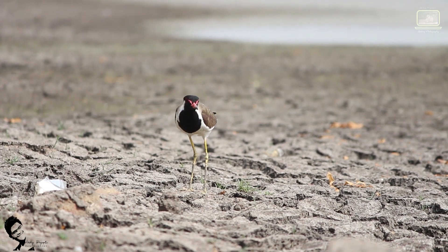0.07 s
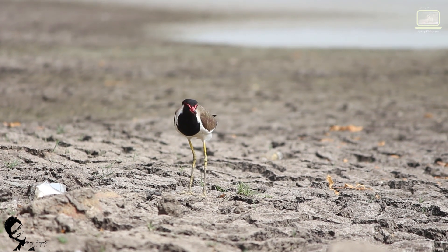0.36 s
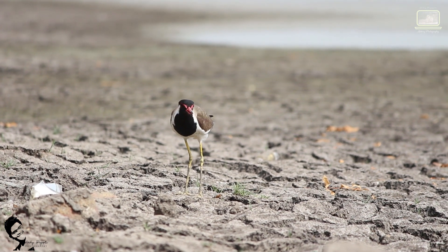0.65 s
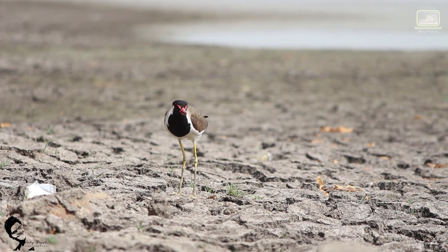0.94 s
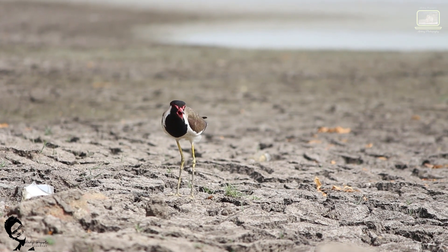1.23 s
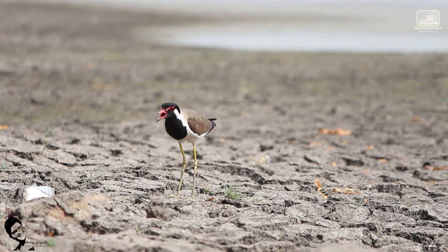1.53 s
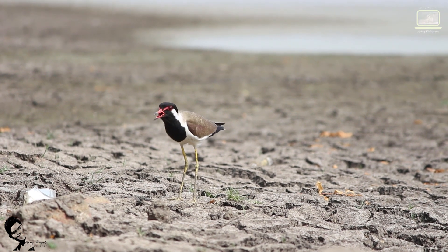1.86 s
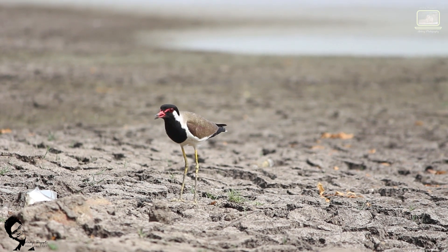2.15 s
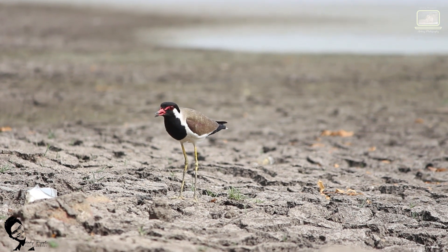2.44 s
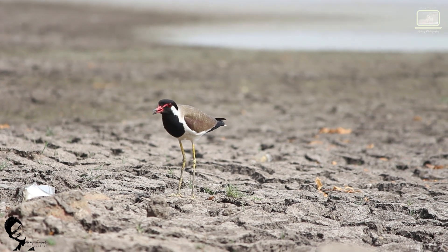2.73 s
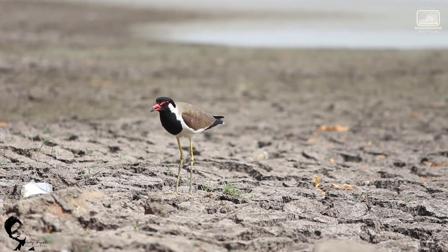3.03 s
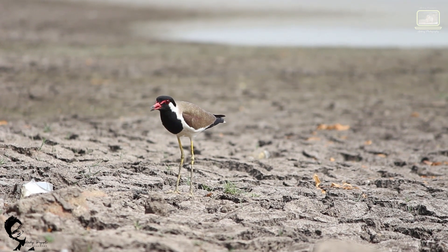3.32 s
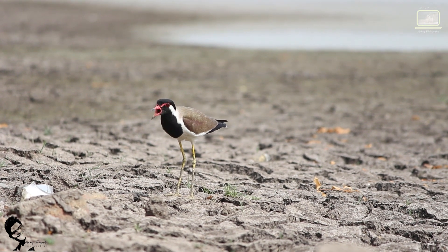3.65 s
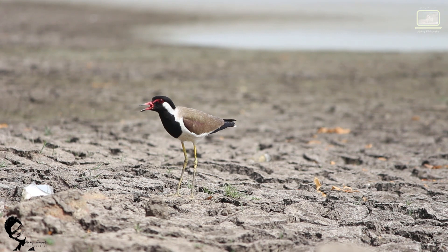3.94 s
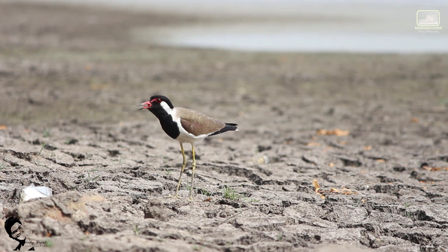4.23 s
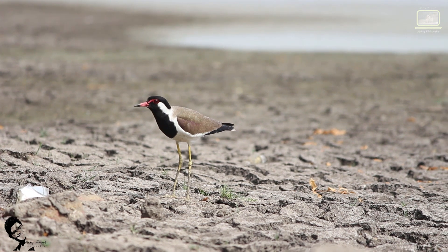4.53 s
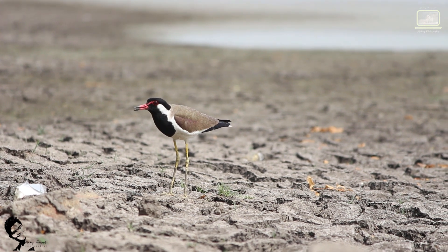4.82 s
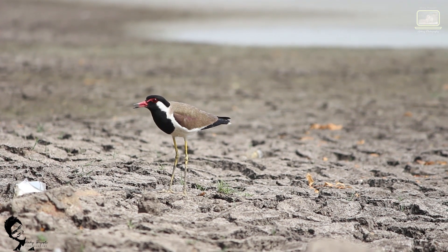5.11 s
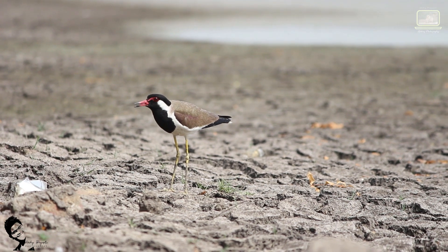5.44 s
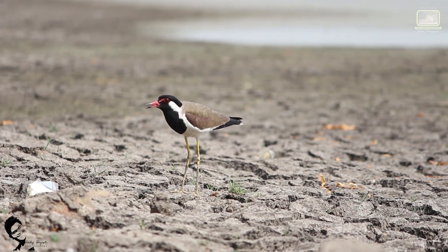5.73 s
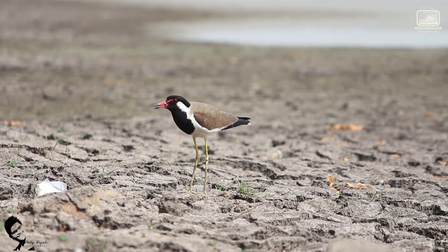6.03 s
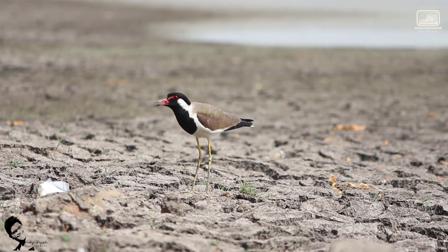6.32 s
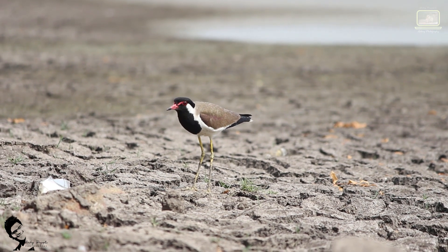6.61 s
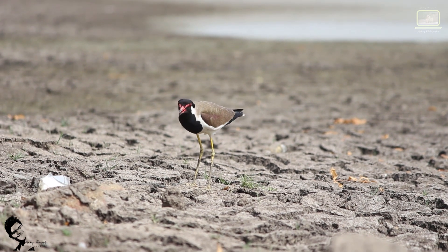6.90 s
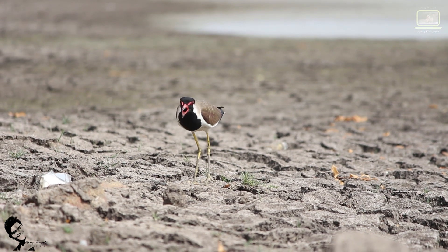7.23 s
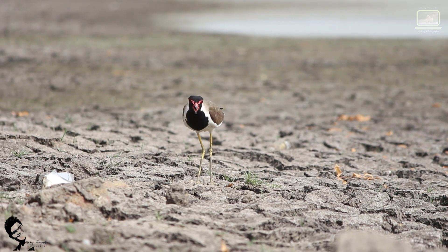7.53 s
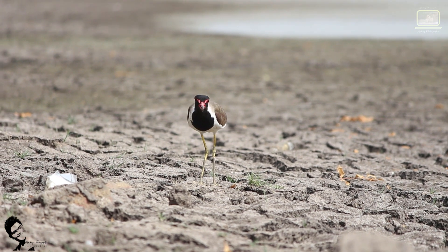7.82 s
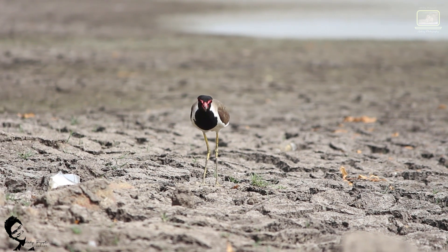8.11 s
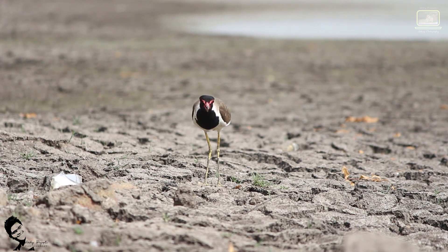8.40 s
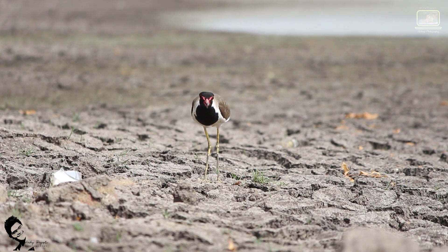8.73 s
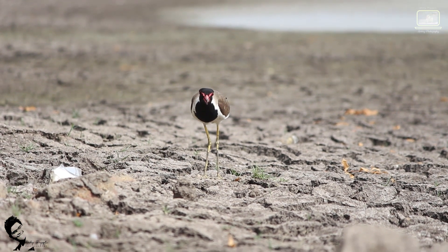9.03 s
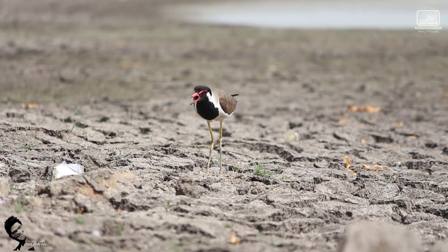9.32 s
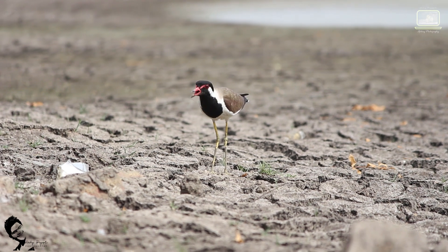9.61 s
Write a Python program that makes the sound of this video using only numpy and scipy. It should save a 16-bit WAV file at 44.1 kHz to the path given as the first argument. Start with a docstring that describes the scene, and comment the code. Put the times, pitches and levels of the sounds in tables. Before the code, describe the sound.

Loud, rapid, high calls of a wading bird come in repeated bursts outdoors, with other birds answering and a soft rumble behind.

```python
"""Lapwings on a mud flat

A lapwing scolds in bursts: a sharp note, fluttering pips that grow longer, then a falling slur
that flips up at its end. Its voice box, the syrinx, flutters by shutting about 80 times a second.
A distant lapwing answers with a like phrase, and another gives arched calls off to the right.
Faint yelps and thin tones carry over a low rumble; the ground and far banks scatter every call."""
import sys
import numpy as np
from scipy import signal
from scipy.fft import rfft, irfft, next_fast_len
from scipy.io import wavfile
from scipy.ndimage import uniform_filter1d

SR = 44100
rng = np.random.default_rng(int(sys.argv[2]) if len(sys.argv) > 2 else 0)


def unload_wav(signal):
    """Save mono or channel-first audio to the path in sys.argv[1] as 16-bit WAV at rate SR, clipped to [-1, 1]."""
    wavfile.write(
        sys.argv[1],
        SR,
        np.round(np.clip(np.atleast_2d(signal).T, -1, 1) * 32767).astype(np.int16),
    )


N = 434826
FLUTTER_S = .0121  # time from one closing of the syrinx to the next
SLUR_TREBLE_DB = -1.5  # slurs are duller than pips

# the near bird's short notes and long closing notes: t/s, length/s, f/Hz, level/dB
NEAR_PIPS = [(1.2861, 0.045, 1417, -20), (1.4409, 0.038, 1374, -22.5), (1.5509, .049, 1387, -23),
             (1.6575, .07, 1384, -22.5), (3.6948, 0.05, 1435, -22.5), (3.8, 0.052, 1363, -26),
             (3.9062, 0.069, 1371, -26), (4.0335, .1, 1367, -26.5), (6.2753, 0.047, 1474, -22.5),
             (7.268, .052, 1458, -22.5), (7.39, 0.044, 1373, -26.5), (7.489, .061, 1350, -26.5),
             (7.6116, 0.087, 1358, -26), (9.3537, 0.046, 1471, -21.5), (9.4592, 0.047, 1374, -25),
             (9.5602, 0.061, 1362, -25.5), (9.6821, .1, 1371, -25)]
NEAR_SLURS = [(1.787, .18, 1355, -20), (4.2011, .13, 1300, -23.5), (7.763, .151, 1326, -23),
              (9.8483, 0.11, 1320, -24)]
# how bright its voice is: t/s, treble/dB
NEAR_TREBLE = [(1.3, 0), (4, 0.9), (6.3, 1.5), (7.3, 1), (9.5, 0.95)]
def near_lapwing(rest_s=.5):
    """The main bird scolds; in the first pip after a rest its syrinx barely shuts."""
    treble_db = lambda s: np.interp(s, *np.transpose(NEAR_TREBLE))
    rested = np.diff([row[0] for row in NEAR_PIPS], prepend=-np.inf) > rest_s
    pips = [(s, length, .37 if first else .98, hz, db, treble_db(s))
            for (s, length, hz, db), first in zip(NEAR_PIPS, rested)]
    slurs = [(s, length, hz, db, treble_db(s) + SLUR_TREBLE_DB) for s, length, hz, db in NEAR_SLURS]
    return phrases(pips, slurs, rasp=.019)


def phrases(pips, slurs, rasp, overlap_s=.006):
    """One bird's notes laid out in time; each flip breaks in before its slur has died."""
    out = np.zeros(N)
    for s, length, depth, hz, db, treble_db in pips:
        add(out, s, amp(db + 5) * pip(length, depth, hz, treble_db, rasp))
    for s, length, hz, db, treble_db in slurs:
        add(out, s, amp(db + 2.5) * slur(length, hz, treble_db, rasp))
        flip_s = .085 - .25 * length  # a longer slur gets a shorter flip
        add(out, s + length - overlap_s, amp(db) * flip(flip_s, hz, rasp))
    return out


# how a pip runs out of breath: flutter depth, length/s, share of pitch lost, level lost/dB
PIP_DRAIN = [(.45, 0.0355, 0.202, 14), (.95, 0.0259, 0.12, 9)]
def pip(length, depth, hz, treble_db, rasp, held_s=.025):
    """A short note flutters, then holds; pitch, level and treble sink as the air pressure drains."""
    t = np.arange(round(length * SR)) / SR
    beats = max(round((length - held_s) / FLUTTER_S), 1)
    gate = flutter(t, beats, depth, ease_s=.1, width=.221)
    depths, *columns = np.transpose(PIP_DRAIN)
    drain_s, droop, loss_db = (np.interp(depth, depths, column) for column in columns)
    drain = np.maximum(1 - (length - t) / drain_s, 0) ** 2
    return amp(-loss_db * drain) * scold(t, hz * (1 - droop * drain), gate, treble_db - 2 * drain, rasp)


# the slur's closing fall: share of its length, pitch factor, level/dB
SLUR_SHAPE = [(0, 1, 0), (.25, .985, -1.5), (.45, .94, -4.5), (.62, .875, -9), (.82, .805, -10.5),
              (1, .775, -9.5)]
def slur(length, hz, treble_db, rasp, fall_s=.11):
    """A long fluttered note holds its pitch, then falls and grows duller."""
    t, bend, gain = contour(SLUR_SHAPE, length, hold_s=length - fall_s)
    beats = round((length - .055) / FLUTTER_S)
    gate = flutter(t, beats, depth=1, ease_s=1.37 * length, width=.195)
    dulling_db = 51 * (1 - bend)
    return gain * scold(t, hz * bend, gate, treble_db - dulling_db, rasp, sag=.0245)


# the upward flip: share of its length, pitch factor, level/dB
FLIP_SHAPE = [(0, 1.02, -13), (.35, 1.13, -12.5), (.68, 1.215, -13), (1, 1.16, -18)]
# its harmonics, lowest first: level/dB
FLIP_HARMONICS = [-0.5, 4.5, -2, -10.5, -11.5, -39, -26, -18, -20]
def flip(length, hz, rasp):
    """The voice cracks upward and brightens toward the top."""
    t, bend, gain = contour(FLIP_SHAPE, length)
    progress = t / length
    crack = .08 * progress ** 2 + .19 * np.exp(-t / .0054)
    voice = syrinx(hz * bend, FLIP_HARMONICS, 12 * (progress - .65), jitter=.015, rasp=rasp + crack)
    return gain * voice * fade(t, .011, .003)


# harmonics of pips and slurs, lowest first: level/dB
SCOLD_HARMONICS = [-26.5, 0, -9, -5.5, -10.5, -15.5, -23.5, -29, -26.5, -32, -30]
# hiss of air forced through the syrinx: f/Hz, level/dB
BREATH_SPECTRUM = [(600, -23), (1800, -32), (2900, 10), (4300, 4.5), (6500, -17), (8500, -10),
                   (13000, -8.5), (16000, -19)]
def scold(t, hz, gate, treble_db, rasp, sag=.0571, hiss_db=-27, spit_db=-16):
    """The pitch sags each time the syrinx shuts; air hisses through and spits as it reopens."""
    pitch = hz * (1 - sag * (1 - gate))
    voice = syrinx(pitch, SCOLD_HARMONICS, treble_db, jitter=.004 + .1 * rasp, rasp=rasp)
    colour = amp(look_up(BREATH_SPECTRUM, np.fft.rfftfreq(len(t), 1 / SR)))
    air = unit(irfft(rfft(rng.standard_normal(len(t))) * colour, len(t)))
    opening = np.clip(np.gradient(gate) * SR * .014, 0, 1)
    breath = amp(treble_db) * air * (amp(hiss_db) * np.sqrt(gate) + amp(spit_db) * opening)
    swell = 1 - .18 * np.exp(-t / .012)
    return (voice * gate + breath) * swell * fade(t, .0039, .0071)


def flutter(t, beats, depth, ease_s, width):
    """The syrinx shuts again and again, a little unevenly and ever less firmly: 1 is open, 0 shut."""
    cycle = (t + .0037) / FLUTTER_S + .048 * wander(len(t), 124)
    nearest_beat = np.clip(np.round(cycle), 1, beats)
    shut = np.exp(-((cycle - nearest_beat) / width) ** 2)
    return 1 - depth * np.exp(-(t / ease_s) ** 2) * shut


def syrinx(hz, harmonics_db, treble_db=0, jitter=.0039, rasp=.03):
    """A bird's voice: harmonics (multiples of one trembling pitch), each flickering and raspy."""
    size, out = len(hz), 0
    phase = 2 * np.pi * np.cumsum(hz * (1 + jitter * wander(size, 450))) / SR
    for k, db in enumerate(harmonics_db, 1):
        flicker_db = 1.4 * min(k / 4, 1) * wander(size, 90)
        level = amp(db + treble_db * np.clip(k / 2 - 1, 0, 1) + flicker_db)
        roughness = rasp * np.sqrt(k) * (wander(size, 1100) + 1j * wander(size, 1480))
        lag = np.pi * k * k / 8  # the windpipe delays each harmonic differently
        tone = ((1 + roughness) * np.exp(1j * (k * phase - lag))).real
        out = out + level * tone * (k * hz < SR / 2)
    return np.sqrt(2) * out


# single calls: t/s, f/Hz, level/dB, boost of the third harmonic/dB
ARCHED_CALLS = [(1.31, 1257, -32, -4), (3.561, 1286, -25, -13.5), (4.037, 1306, -23.5, -11.5),
                (4.534, 1285, -24.5, -21), (5.057, 1263, -24, -18), (5.484, 1281, -26, -14.5),
                (6.081, 1300, -29, -5.5), (8.068, 1228, -28.5, -6.5), (8.49, 1257, -28, -7.5),
                (8.93, 1294, -27, -15), (9.371, 1149, -35, 3)]
# their rise and fall: share of the length, pitch factor, level/dB
ARCH_SHAPE = [(0, .88, -14), (.15, 0.95, -4.5), (.35, 0.97, 0), (.5, 1, 0.5), (.65, .98, 0),
              (.8, .92, -2.5), (1, 0.78, -8)]
# their harmonics, lowest first: level/dB
ARCH_HARMONICS = [-27, 0, 13, -11.5, -25.5, -23.5, -47, -40]
def arched_calls(length=.082, buzz_hz=290):
    """Calls that rise and fall; a second, slower vibration roughens them, most at the start."""
    out = np.zeros(N)
    is_third = (np.arange(len(ARCH_HARMONICS)) == 2)[:, None]
    for s, hz, db, third_db in ARCHED_CALLS:
        t, bend, gain = contour(ARCH_SHAPE, length)
        progress = t / length
        nasal_db = third_db - 4.5 - 20 * np.maximum(progress - .3, 0)  # holds, then fades
        harmonics = np.array(ARCH_HARMONICS)[:, None] + nasal_db * is_third
        rough = min(.36 * amp(third_db), .45)  # a more nasal call is hoarser
        hoarse = rough * np.exp(-(progress / 1.5) ** 2) + 1.55 * np.exp(-t / .0061)
        buzz = hoarse * np.sin(2 * np.pi * np.cumsum(buzz_hz * (1 + .04 * wander(len(t), 200))) / SR)
        treble_db = 6 * (.4 - progress)
        pitch = hz * bend * (1 + .06 * buzz)
        voice = syrinx(pitch, harmonics, treble_db, jitter=.003, rasp=.012 + .4 * hoarse)
        add(out, s, amp(db - .5) * gain * voice * (1 + .12 * buzz) * fade(t, .0067, .0094))
    return out


# the distant bird's phrases: t/s, f/Hz, level/dB, treble/dB
FAR_PHRASES = [(.442, 1407, -46.5, -4), (2.623, 1406, -45.5, -5), (4.632, 1380, -47, -4.5),
               (5.551, 1410, -45.5, -6), (6.528, 1400, -49, -0.5), (8.066, 1420, -45, 0)]
# two pips and a slur: t/s into the phrase, length/s
FAR_RHYTHM = [(0, 0.0517), (.104, 0.0633), (.24, .2)]
def far_lapwing(depth=.825):
    """A faint, raspier bird answers, always in the same rhythm."""
    *pip_rhythm, (slur_at, slur_length) = FAR_RHYTHM
    pips, slurs = [], []
    for s, hz, db, treble_db in FAR_PHRASES:
        pips += [(s + at, length, depth, hz, db - .5, treble_db) for at, length in pip_rhythm]
        slurs.append((s + slur_at, slur_length, hz * .98, db + 1, treble_db + SLUR_TREBLE_DB))
    return phrases(pips, slurs, rasp=.11)


# faint yelps: t/s, f/Hz, level/dB
YELPS = [(.23, 1063, -52.5), (.74, 1305, -55.5), (.983, 1347, -51.5), (1.231, 1365, -50.5),
         (1.484, 1180, -49), (1.725, 1137, -50), (2.005, 1162, -49), (2.28, 1083, -51),
         (3.124, 1406, -53.5), (3.51, 1221, -45), (3.849, 1197, -43.5), (4.136, 1164, -47.5),
         (4.484, 1203, -44.5), (6.665, 1167, -48.5), (6.98, 1270, -50), (8.765, 1320, -56),
         (9.272, 1270, -58), (9.507, 1210, -51)]
# their rise: share of the length, pitch factor, level/dB
YELP_SHAPE = [(0, 0.78, -6), (.3, 0.97, 3), (.7, 0.97, 0.5), (1, 0.99, -0.5)]
# their harmonics, lowest first: level/dB
YELP_HARMONICS = [-19, 0.5, 4.5, -12, -11.5, -32]
def yelps(length=.0512):
    """Far rising calls; in higher ones the second harmonic nears the pitch at which the throat rings."""
    out = np.zeros(N)
    for s, hz, db in YELPS:
        t, bend, gain = contour(YELP_SHAPE, length)
        harmonics = np.array(YELP_HARMONICS)
        harmonics[1] += 60 * np.log(hz / 1200)
        add(out, s, amp(db) * gain * syrinx(hz * bend, harmonics, rasp=.11) * fade(t, .0028, .0038))
    return out


# thin whistling tones, the highest just after the distant lapwing's flips:
# t/s, length/s, first f/Hz, last f/Hz, level/dB
THIN_TONES = [(0.909, 0.11, 7200, 7030, -52), (0.974, 0.21, 6300, 5550, -57),
              (3.226, 0.19, 2197, 1877, -49), (6.018, .07, 7300, 7200, -51), (6.97, .11, 7280, 7300, -49)]
def thin_tones():
    """Faint whistling, mostly sliding down and levelling off; the lower, the hoarser."""
    out = np.zeros(N)
    for s, length, first_hz, last_hz, db in THIN_TONES:
        t = np.arange(round(length * SR)) / SR
        hz = last_hz + (first_hz - last_hz) * np.exp(-(t / .054) ** 2)
        tone = syrinx(hz, [0], jitter=.0045, rasp=700 / last_hz)
        add(out, s, amp(db - 7) * tone * fade(t, .013, length / 2))
    return out


# how long echoes last: f/Hz, time to fade by 60 decibels/s
ECHO_DECAY = [(1000, 0.34), (3000, 0.56), (7000, 0.54), (14000, 0.11)]
def echoes(x, blur_radians=.55, blur_hz=130):
    """Rough ground and far banks send back many tiny echoes; moving air jostles their phase."""
    slots = np.arange(300, SR - 20, 20)
    arrivals = slots + rng.integers(0, 20, (2, len(slots)))
    taps = np.zeros((2, SR))
    np.put_along_axis(taps, arrivals, rng.choice([-1., 1.], arrivals.shape), 1)
    hz, t, bands = signal.stft(taps, SR, nperseg=256)
    decay = amp(-60 * t / look_up(ECHO_DECAY, hz)[:, None])
    tail = signal.istft(bands * decay, SR, nperseg=256)[1]
    wet = signal.fftconvolve(x, tail / np.linalg.norm(tail[0]), axes=1)[:, :N]
    jostle = np.exp(1j * blur_radians * np.array([wander(N, blur_hz), wander(N, blur_hz)]))
    return (jostle * signal.hilbert(wet, next_fast_len(N))[:, :N]).real


# loudness of the rumble: t/s, deep level/dB, upper level/dB
RUMBLE_LEVELS = [(0.0, -58.5, -47.5), (3.49, -45.5, -47.5), (3.55, -52, -49.5), (5.29, -48.5, -45),
                 (7.04, -55, -51.5), (7.53, -55, -46.5), (8.11, -61.5, -51), (9.55, -60.5, -54),
                 (9.8, -57.5, -52)]
# its tone colour: f/Hz, level/dB
RUMBLE_SPECTRUM = [(12, -53), (22, -24), (40, -8), (75, 4), (183, 1.5), (236, 0.5), (346, -13), (447, -21),
                   (900, -57), (1170, -37), (1980, -120)]
# the pitch of the hum in it: t/s, f/Hz
HUM_PITCH = [(0, 193.6), (1.4, 154.7), (2.1, 162.2), (3.3, 125.6), (4.3, 184.9), (5.2, 225.7), (6.5, 160.3),
             (7.2, 205), (7.7, 171.9), (9.8, 186.4)]
def rumble(noise, hz, split_hz=120, hum_db=-6.5, hum_width_hz=20):
    """Low noise whose deep and upper parts swell separately; a hum wanders through the upper one."""
    t = np.arange(N) / SR
    times, deep_db, upper_db = np.transpose(RUMBLE_LEVELS)
    swell = lambda db: amp(np.interp(t, times, db) + .85 * wander(N, 9.4))
    low = noise * amp(look_up(RUMBLE_SPECTRUM, hz))
    deep_share = 1 / (1 + (hz / split_hz) ** 8)
    deep = swell(deep_db) * unit(irfft(low * deep_share, N))
    tone = np.exp(2j * np.pi * np.cumsum(np.interp(t, *np.transpose(HUM_PITCH))) / SR)
    hum = unit((tone * (wander(N, hum_width_hz) + 1j * wander(N, hum_width_hz))).real)
    upper = unit(irfft(low * (1 - deep_share), N))
    return deep + swell(upper_db) * unit(upper + amp(hum_db) * hum)


# tone colour of the open air's hiss: f/Hz, level/dB
HISS_SPECTRUM = [(350, -6), (600, -1), (1180, -6.5), (1280, -4.5), (1800, -4), (2870, -7), (3780, -7.5),
                 (4340, -13), (5710, -13), (6730, -16), (16000, -25.5)]
# how alike left and right are: f/Hz, likeness (1 the same, -1 opposite)
STEREO_LIKENESS = [(30, 0.93), (95, 0.95), (210, 0.82), (320, 0.28), (450, -0.29), (650, -0.53),
                   (1400, -0.085), (3000, 0.17), (7000, -.24), (15000, -.13)]
def open_air(hiss_db=-53.5):
    """The background: the rumble under a thin, gently wavering hiss."""
    hz = np.fft.rfftfreq(N, 1 / SR)
    left, other = rfft(rng.standard_normal((2, N)))
    same = look_up(STEREO_LIKENESS, hz)
    noise = np.array([left, same * left + np.sqrt(1 - same ** 2) * other])
    hiss = unit(irfft(noise * amp(look_up(HISS_SPECTRUM, hz)), N))
    return rumble(noise, hz) + amp(hiss_db + .8 * wander(N, 9.4)) * hiss


def amp(db):
    """Turns decibels into a gain."""
    return 10 ** (np.asarray(db) / 20)


def unit(x):
    """Scales a signal to an average power of 1."""
    return x / np.sqrt(np.mean(x ** 2) + 1e-20)


def look_up(points, hz):
    """Reads between a table's rows on a log-frequency axis."""
    f, value = np.transpose(points)
    return np.interp(np.log(hz + 1), np.log(f + 1), value)


def add(mix, s, sound):
    """Lays a sound into the mix at s seconds."""
    part = mix[max(round(s * SR), 0):][:len(sound)]
    part += sound[:len(part)]


def wander(size, rate_hz):
    """A smooth random wobble, about 1 in size, that moves up to about the given rate."""
    noise = rng.standard_normal(size + 4096)
    hz = np.fft.rfftfreq(len(noise), 1 / SR)
    return unit(irfft(rfft(noise) * np.exp(-(hz / rate_hz) ** 2)))[:size]


def fade(t, rise_s, fall_s):
    """Soft start and end of a note."""
    rise = np.sin(np.pi / 2 * np.clip(t / rise_s, 0, 1))
    fall = np.sin(np.pi / 2 * np.clip((t[-1] - t) / fall_s, 0, 1)) ** 2
    return rise * fall


def contour(shape, length, hold_s=0):
    """Time, pitch factor and gain along one call, which may first hold its pitch a while."""
    t = np.arange(round(length * SR)) / SR
    share, bend, db = np.transpose(shape)
    progress = (t - hold_s) / (length - hold_s)
    smooth = lambda v: uniform_filter1d(np.interp(progress, share, v), size=300, mode="nearest")
    return t, smooth(bend), amp(smooth(db))


def place(x, side):
    """Shares a sound between left and right, band by band, in level and in phase."""
    hz, side = np.fft.rfftfreq(N, 1 / SR), np.array(side)
    left = amp(look_up(side[:, :2], hz) / 2) * np.exp(.5j * look_up(side[:, ::2], hz))
    gains = np.array([left, 1 / left])
    return irfft(rfft(x) * gains / abs(gains).mean(0), N)


# where each source is heard: f/Hz, left minus right/dB, left's phase lead/rad
NEAR_SIDE = [(1300, -6.5, -0.19), (2650, -3.5, 0.33), (4050, -3, 0.5), (6000, 2, 0.87), (7300, -2, 0.46),
             (8700, 0, 1), (9800, -2, 0.86), (14800, -0.5, 0.78)]
RIGHT_SIDE = [(1300, -7, -4), (2520, -7, -0.07), (5000, -3.5, -1.56), (8160, -2, -2.5)]
FAR_SIDE = [(2700, 1, 0.14), (5300, 0.27, 0.73), (8300, 1, 0.7)]
AIR_SIDE = [(30, 1, -1.8), (80, 3, -1.32), (179, -1.2, -0.78), (320, -1.6, -0.67), (600, -1.5, -0.019),
            (15000, -0.5, 0.039)]
def scene():
    """Birds around the flat; more of a distant call arrives as echo."""
    near = place(near_lapwing(), NEAR_SIDE)
    right = place(arched_calls(), RIGHT_SIDE)
    far = place(far_lapwing(), FAR_SIDE)
    far = signal.sosfilt(signal.butter(2, 10500, fs=SR, output="sos"), far)  # air absorbs its treble
    faint = place(yelps() + thin_tones(), [(2520, -1, 0), (6000, 0, 0)])
    direct = near + right + amp(2.5) * far + faint
    scattered = amp(-18) * near + amp(-18.5) * right + far + amp(-10) * faint
    return direct + echoes(scattered) + place(open_air(), AIR_SIDE)


def record(dry, cutoff_hz=15900):
    """Cuts off the very highest treble."""
    lowpass = signal.firwin(301, cutoff_hz, window=("kaiser", 9), fs=SR)
    return signal.oaconvolve(dry, lowpass[None], "same")


dry = scene()
out = record(dry)
unload_wav(out)
```